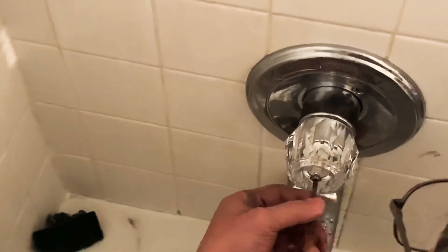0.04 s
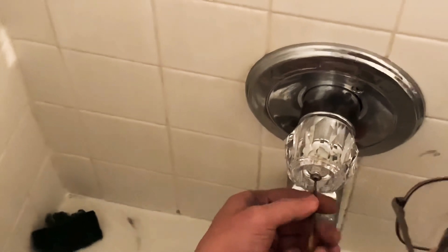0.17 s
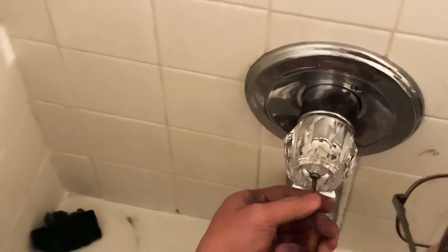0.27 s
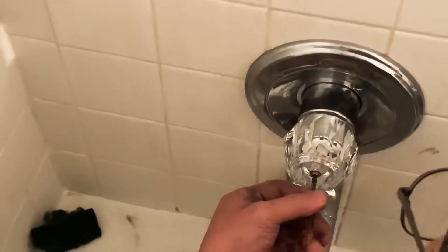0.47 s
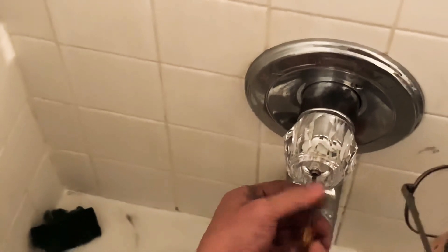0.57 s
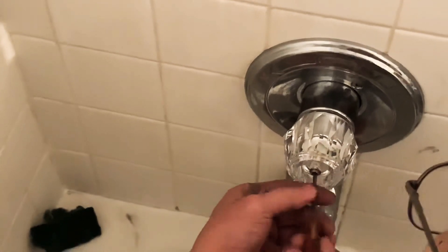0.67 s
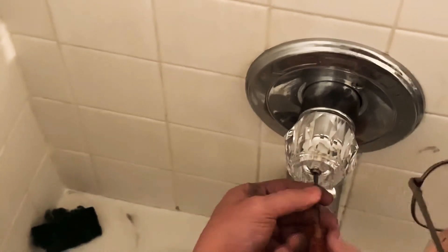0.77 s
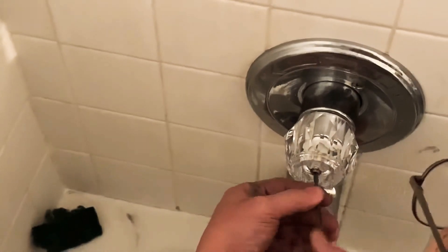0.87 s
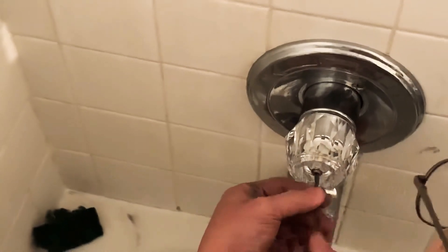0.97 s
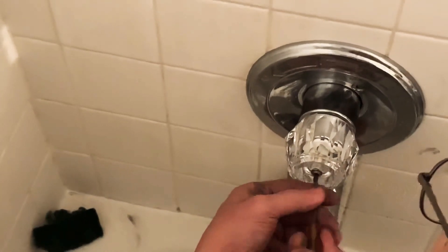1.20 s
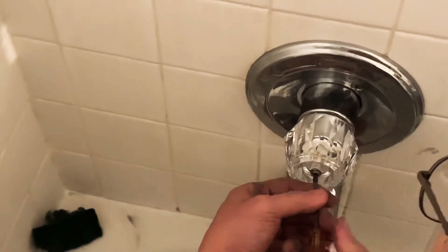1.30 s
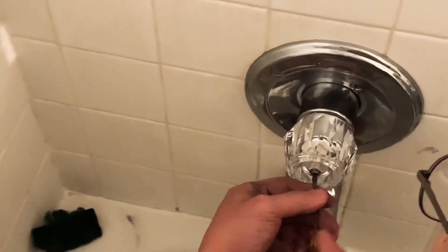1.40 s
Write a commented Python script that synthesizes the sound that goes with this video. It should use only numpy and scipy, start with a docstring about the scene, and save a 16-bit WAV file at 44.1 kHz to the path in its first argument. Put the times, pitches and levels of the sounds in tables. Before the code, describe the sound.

A shower valve shuts with one hollow thud as fingers softly scuff and click the knob.

```python
"""A small tiled bathroom, the stereo microphones of a hand-held camera close to the shower faucet.
Over faint room tone, the grip on the camera bumps softly and fingers scuff across the plastic knob.
A quarter second in, the valve seats with a dull thump that booms in the hollow wall. The knob clicks
against its play; then come thin squeaks, ticks, two fainter knocks and more scuffs and low bumps."""
import sys
import numpy as np
from scipy import signal
from scipy.fft import rfft, irfft
from scipy.io import wavfile

SR = 44100
rng = np.random.default_rng(int(sys.argv[2]) if len(sys.argv) > 2 else 0)


def materialize(psi):
    """Save the field psi as 16-bit PCM at rate SR to the path in sys.argv[1].

    A 1-D psi becomes a single channel; in a 2-D psi each row is a channel.
    """
    bounded = np.clip(np.atleast_2d(psi).T, -1, 1)
    quanta = np.round(bounded * 32767).astype(np.int16)
    wavfile.write(sys.argv[1], SR, quanta)


N = 63945
T = np.arange(N) / SR
HZ = np.fft.rfftfreq(N, 1 / SR)

# likeness of the two microphones: f/Hz, likeness/0-1
MIC_LIKENESS = [(60, 0.92), (150, 0.96), (300, 0.67), (700, 0.59), (1500, 0.52), (4000, 0.16),
                (14000, 0.017)]
# balance of close sounds at the microphones: f/Hz, left minus right/dB
MIC_BALANCE = [(150, 0), (400, 0.5), (800, 1), (2400, 4.5), (4400, 0.5), (8300, -5.5), (13000, 0)]
# reflections off the tiles: f/Hz, t60/s
TILE_DECAY = [(100, 1), (400, 0.4), (1300, 1), (3500, 0.97), (8000, 0.37), (14000, 0.34)]
# standing waves between the walls: f/Hz, peak gain relative to STANDING_DB/dB, t60/s
STANDING_WAVES = [(422.5, 4, 0.73), (510, -7, .5), (640, -1, 0.85), (684, -7.5, 0.17), (798, 7, 2),
                  (1153, -4, 0.35), (1206, 5.5, 3.9), (1356, 8.5, 0.45), (1475, 4.5, 1)]
# room tone: f/Hz, relative density/dB
ROOM_SPECTRUM = [(20, 5.5), (60, 16), (130, 12.5), (250, 3.5), (500, -12), (1000, -14.5), (1400, -13.5),
                 (2000, -20.5), (4000, -21.5), (7000, -26), (10000, -25.5), (14500, -25)]
ROOM_DB, STANDING_DB = -65, 11.5
LOW_CUT_HZ, HIGH_CUT_HZ = 42, 14600

# the grip shifts on the camera: t/s, level/dB, f/Hz
GRIP_BUMPS = [(.002, -43, 127), (0.038, -46, 114), (0.089, -43.5, 118), (.135, -51, 158), (.385, -44, 212),
              (0.413, -47.5, 121), (.565, -46, 131), (.612, -44, 67), (.628, -48, 120.4),
              (0.674, -47.5, 113), (0.704, -49.5, 147.5), (0.791, -50, 133.3), (.822, -49.5, 181.6),
              (0.955, -50.5, 105.2), (1.07, -41.5, 108.6), (1.104, -41.5, 114.5), (1.143, -44, 113.2),
              (1.184, -49, 88.5), (1.22, -49, 77), (1.276, -58.5, 221), (1.302, -43.5, 124),
              (1.371, -49, 198), (1.387, -44.5, 213), (1.411, -47.5, 155), (1.439, -52, 181)]
# the palm rustles on the camera: t/s, length/s, level/dB
PALM_RUSTLES = [(-.04, 0.13, -63), (0.045, 0.2, -62), (0.308, 0.21, -46), (0.482, 0.195, -56.5),
                (0.665, 0.22, -57.5), (1.048, 0.1, -55), (1.153, .1, -74), (1.252, 0.12, -57.5),
                (1.346, 0.11, -50)]
# that rustle through the camera body: f/Hz, relative density/dB
PALM_SPECTRUM = [(20, -16), (40, -6.5), (60, 3), (85, 2.5), (120, -0.5), (180, 6), (260, -10.5),
                 (400, -13.5), (600, -36.5), (1200, -77)]

# a fingertip squeaks on chrome: t/s, length/s, level/dB, f/Hz
CHROME_SQUEAKS = [(0.114, 0.061, -74, 3170), (0.577, 0.037, -76.5, 3460), (0.682, .05, -82, 2300)]
SQUEAK_WIDTH_HZ = 390
# finger strokes: t/s, length/s, dull rub/dB, hollow scrape/dB, dry rasp/dB, fine hiss/dB
FINGER_STROKES = [(.064, .03, -68.5, -81, -88, -90), (0.078, 0.047, -66.5, -86.5, -86.5, -83.5),
                  (.11, 0.088, -66, -73.5, -91, -88), (0.258, .06, -75.5, -92, -73, -78.5),
                  (0.375, 0.072, -82, -66.5, -71.5, -87), (0.457, 0.1, -74.5, -81, -81.5, -93),
                  (0.516, 0.062, -71.5, -81.5, -80, -76), (0.558, 0.065, -61, -66, -69, -76.5),
                  (0.612, 0.041, -61.5, -69, -95, -99), (0.963, 0.16, -81.5, -89, -93, -84),
                  (1.252, 0.04, -73, -72.5, -90, -92)]
# the four parts of a stroke, each: f/Hz, relative density/dB
RUB_SPECTRUM = [(100, -11.5), (250, 7), (420, 4), (560, -2.5), (700, -13), (850, -3.5), (1000, -23),
                (2000, -45)]
SCRAPE_SPECTRUM = [(400, -32), (830, 3.5), (1000, -7), (1250, 6.5), (1550, 3.5), (1900, -11.5),
                   (2350, -6.5), (3000, -21), (5000, -33.5)]
RASP_SPECTRUM = [(1500, -16.5), (2700, -2), (3200, 11.5), (3650, 4), (4100, 5), (5200, -7.5), (6100, -4),
                 (7500, -35), (14000, -30.5)]
HISS_SPECTRUM = [(3000, -28), (6000, -3.5), (7600, -7), (8500, 6.5), (9500, -3.5), (11000, -10),
                 (14000, -16)]

# small ticks of nail and plastic: t/s, level/dB
NAIL_TICKS = [(0.0691, -65), (0.2686, -64), (0.291, -68), (0.5363, -78), (0.7602, -68), (1.0078, -71),
              (1.054, -74), (1.2568, -65.5), (1.3374, -82)]
# one such tick: f/Hz, relative density/dB
TICK_SPECTRUM = [(500, -47), (1500, 3.5), (3200, 1), (5000, -17.5), (7500, -12.5), (10000, 4.5),
                 (12000, -11), (14000, -2)]
# the knob knocks against its play: t/s, ring level/dB, crack level/dB
KNOB_KNOCKS = [(0.3666, -51.5, -60), (0.583, -70, -98), (1.074, -71, -105)]
# modes of the hollow knob: f/Hz, relative level/dB, t60/s
KNOB_MODES = [(1102, 6, 0.032), (1156, 0, .045), (1258, -6.5, 0.084), (1540, -46, .14), (2620, -26, 0.21),
              (3260, -29, 0.15), (4200, -41, 0.089)]
# the crack of a knock: f/Hz, relative density/dB
CRACK_SPECTRUM = [(300, -29), (1000, -1), (2000, 7.5), (4000, 7.5), (5200, -7), (7500, -4.5), (9000, -2),
                  (14000, -12)]

# the valve stem judders as it seats: f/Hz, relative density/dB
JUDDER_SPECTRUM = [(30, -34), (60, -30.5), (100, 3), (200, -2), (380, -9), (650, -21.5), (1000, -23.5),
                   (1600, -29), (2300, -36), (3200, -54.5), (6000, -68.5)]
JUDDER_S, JUDDER_HOLD_S, JUDDER_DB, JUDDER_SAG_DB_PER_S = 0.2188, 0.089, -38.5, 61
# modes of the hollow wall and tub: f/Hz, level relative to THUMP_DB/dB, t60/s
WALL_MODES = [(63.74, -19, 1.04), (115.2, -1, 0.32), (134.4, 2, 0.31), (178.2, -7, 0.71),
              (211.8, -25.5, 0.18), (258.5, -24.5, 0.62), (297.7, -24, 0.61), (445, -26.5, 0.68),
              (499, -31, 0.22), (530, -28.5, .38), (620, -52, 0.22), (736, -29.5, 0.19), (842, -44, 1.8),
              (918, -30.5, 0.17)]
THUMP_S, THUMP_DB, THUMP_RISE_S = 0.2335, -24, 0.012
BOOM_BEND, BOOM_SETTLE_S = 0.12, 0.02  # the boom starts flat by this share and rises as the stem seats


def amp(db):
    """Decibels to gain."""
    return 10 ** (np.asarray(db) / 20)


def unit(x):
    """Scales to rms 1."""
    return x / np.sqrt(np.mean(x ** 2) + 1e-20)


def read(points, hz):
    """Reads a table on a log-frequency axis."""
    f, value = np.transpose(points)
    return np.interp(np.log(hz + 1), np.log(f + 1), value)


def colour(pair, spectrum):
    """Gives two unrelated signals a spectrum and the likeness of the two microphones, at rms 1."""
    left, unrelated = rfft(pair)
    likeness = np.clip(read(MIC_LIKENESS, HZ), 0, 1)
    right = likeness * left + np.sqrt(1 - likeness ** 2) * unrelated
    return unit(irfft(np.array([left, right]) * amp(read(spectrum, HZ)), N))


def noise(spectrum):
    """Steady stereo noise of rms 1."""
    return colour(rng.standard_normal((2, N)), spectrum)


def slips(spectrum, per_s, spread_db):
    """Friction: a dense train of tiny slips of uneven size."""
    slipping = rng.random(N) < per_s / SR
    size = amp(spread_db * np.minimum(rng.exponential(1, N), 3))
    return colour(slipping * size * rng.standard_normal((2, N)), spectrum)


def stroke(start, length):
    """Envelope of a rubbing movement: it swells and fades."""
    return np.abs(np.sin(np.pi * np.clip((T - start) / length, 0, 1))) ** 0.7


def strike(start, rise_s, t60, hold_s=0):
    """Envelope of a blow: smooth rise, hold, exponential decay."""
    rise = np.sin(np.pi / 2 * np.clip((T - start) / rise_s, 0, 1)) ** 2
    return rise * np.exp(-np.log(1000) * np.maximum(T - start - rise_s - hold_s, 0) / t60)


def ring(start, modes, rise_s, lag_s=0):
    """Struck modes ring down; while lag_s grows, their pitch is flat."""
    return sum(amp(db) * strike(start, rise_s, t60) * np.sin(2 * np.pi * hz * (T - start - lag_s))
               for hz, db, t60 in modes)


def bathroom(x, wet_db):
    """Adds dense tile reflections above the bass, each band dying at its own speed, and standing waves."""
    hz, t, bands = signal.stft(rng.standard_normal((2, SR)), SR, nperseg=256)
    decay = np.exp(-np.log(1000) * t / read(TILE_DECAY, hz)[:, None])
    tail = signal.istft(bands * decay, SR, nperseg=256)[1][:, :SR]
    bass_cut = signal.butter(3, 260, "high", fs=SR, output="sos")
    tail = signal.sosfilt(bass_cut, tail / np.linalg.norm(tail[0]))
    for mode_hz, db, t60 in STANDING_WAVES:
        rate = np.log(1000) / t60
        wave = np.exp(-rate * T[:SR]) * np.sin(2 * np.pi * mode_hz * T[:SR])
        tail += amp(STANDING_DB + db) * 2 * rate / SR * wave
    return x + amp(wet_db) * signal.fftconvolve(x * np.ones((2, 1)), tail, axes=1)[:, :N]


def microphones(x, lag_s):
    """The two microphones differ in colour, and the left one hears a moment later."""
    hz = np.fft.rfftfreq(2 * N, 1 / SR)
    side = np.array([[0.5], [-0.5]])
    balance = amp(side * read(MIC_BALANCE, hz))
    delay = np.exp(-2j * np.pi * hz * side * lag_s)
    return irfft(rfft(x, 2 * N) * balance * delay)[:, :N]


def room_tone():
    """All around the microphones: faint, steady, mostly low noise."""
    return amp(ROOM_DB) * noise(ROOM_SPECTRUM)


def grip():
    """Right at the microphones: damped low bumps and a soft rustle pass through the camera body."""
    bumps = sum(amp(db) * strike(s, rise_s=0.0042, t60=0.13) * np.sin(2 * np.pi * hz * (T - s))
                for s, db, hz in GRIP_BUMPS)
    rustle_level = sum(amp(db) * stroke(s, length) for s, length, db in PALM_RUSTLES)
    return bumps + rustle_level * slips(PALM_SPECTRUM, per_s=900, spread_db=3)


def squeaks():
    """Close by, a fingertip sticks and slips on chrome: a fuzzy narrow whistle."""
    out = np.zeros((2, N))
    for s, length, db, hz in CHROME_SQUEAKS:
        resonance = 1 / (1 + (2 * (HZ - hz) / SQUEAK_WIDTH_HZ) ** 2)
        whistle = irfft(rfft(rng.standard_normal((2, N))) * resonance, N)
        out += amp(db) * stroke(s, length) * unit(whistle)
    return bathroom(out, wet_db=-5)


def fingers():
    """Close by, skin slips over plastic and chrome in short strokes."""
    spectra = (RUB_SPECTRUM, SCRAPE_SPECTRUM, RASP_SPECTRUM, HISS_SPECTRUM)
    parts = [slips(spectrum, per_s=4000, spread_db=0) for spectrum in spectra]
    scuffs = sum(stroke(s, length) * amp(db) * part
                 for s, length, *levels in FINGER_STROKES for db, part in zip(levels, parts))
    return bathroom(scuffs, wet_db=-5.5)


def knob():
    """Close by, each knock is a short crack and a hollow plastic ring; ticks are tiny cracks alone."""
    body = sum(amp(db) * ring(s, KNOB_MODES, rise_s=0.0047) for s, db, _ in KNOB_KNOCKS)
    crack_level = sum(amp(db) * strike(s - 0.0015, rise_s=0.00082, t60=0.06, hold_s=0.0082)
                      for s, _, db in KNOB_KNOCKS)
    cracks = crack_level * noise(CRACK_SPECTRUM)
    tick_level = sum(amp(db) * strike(s, rise_s=0.001, t60=0.025) for s, db in NAIL_TICKS)
    ticks = tick_level * noise(TICK_SPECTRUM)
    return bathroom(body, wet_db=-15.5) + bathroom(cracks, wet_db=-5) + bathroom(ticks, wet_db=1)


def valve():
    """Behind the knob, the stem judders home, weakening as it seats, and sets the wall booming."""
    settled = 1 - np.exp(-np.maximum(T - THUMP_S, 0) / BOOM_SETTLE_S)
    boom = amp(THUMP_DB) * ring(THUMP_S, WALL_MODES, THUMP_RISE_S, BOOM_BEND * BOOM_SETTLE_S * settled)
    sagging_level = amp(JUDDER_DB - JUDDER_SAG_DB_PER_S * (T - JUDDER_S))
    envelope = strike(JUDDER_S, rise_s=0.0076, t60=0.52, hold_s=JUDDER_HOLD_S)
    judder = sagging_level * envelope * slips(JUDDER_SPECTRUM, per_s=1500, spread_db=1.5)
    return boom + bathroom(judder, wet_db=-10.5)


def scene():
    """From just in front of the faucet: low thuds and the small sounds at the knob, over room tone."""
    thuds = microphones(valve() + grip(), lag_s=0.00027)
    at_knob = microphones(knob() + fingers() + squeaks(), lag_s=0.00011)
    return room_tone() + thuds + at_knob


def record(dry):
    """The camera's low cut and band limit."""
    low_cut = signal.butter(2, LOW_CUT_HZ, "high", fs=SR, output="sos")
    band_limit = signal.firwin(511, HIGH_CUT_HZ, window=("kaiser", 9), fs=SR)
    return signal.oaconvolve(signal.sosfilt(low_cut, dry), band_limit[None], "same")


dry = scene()
out = record(dry)
materialize(out)
```